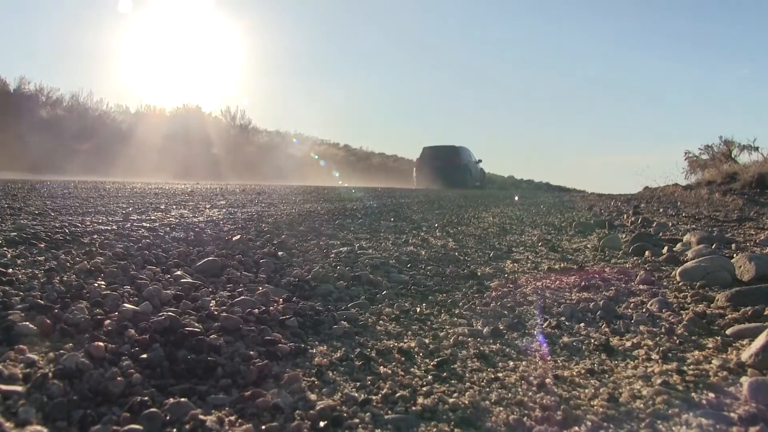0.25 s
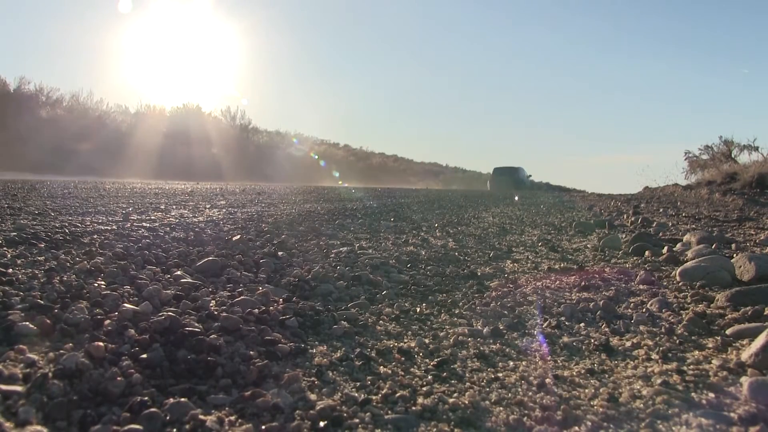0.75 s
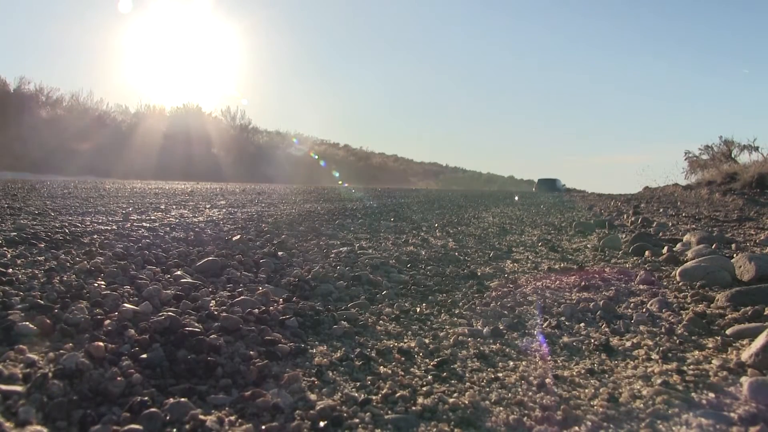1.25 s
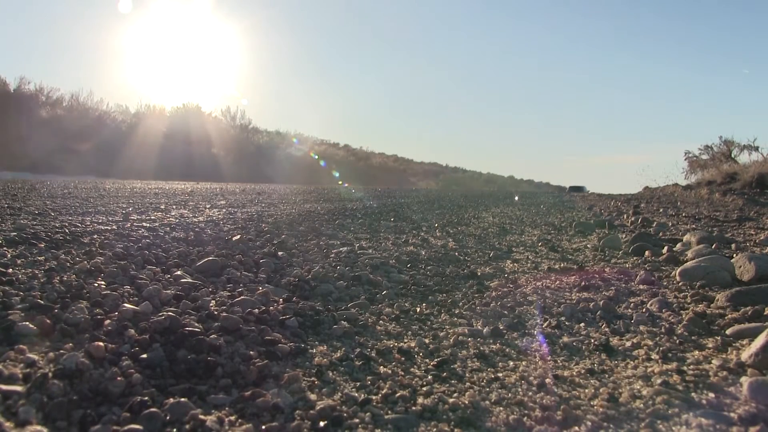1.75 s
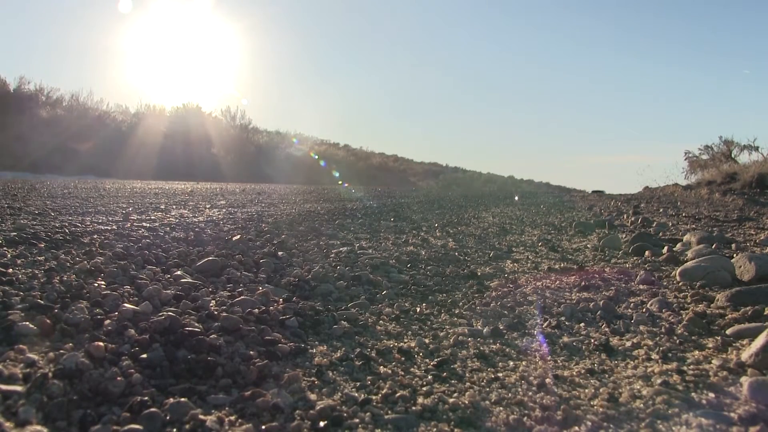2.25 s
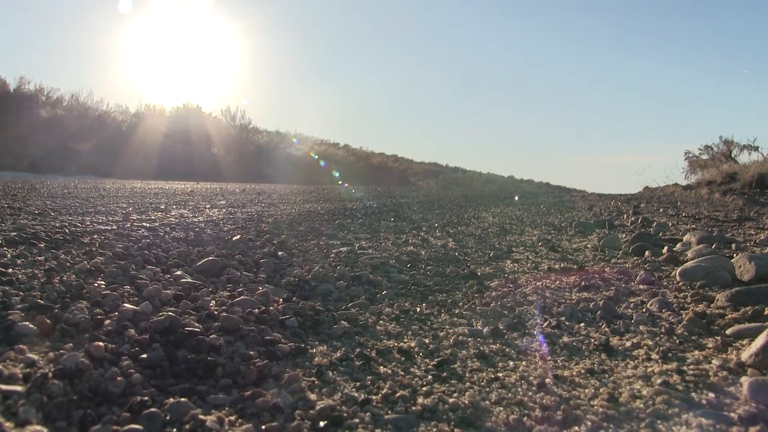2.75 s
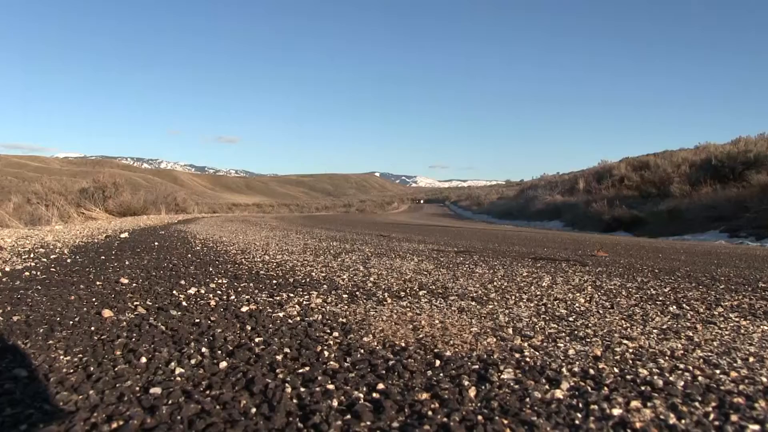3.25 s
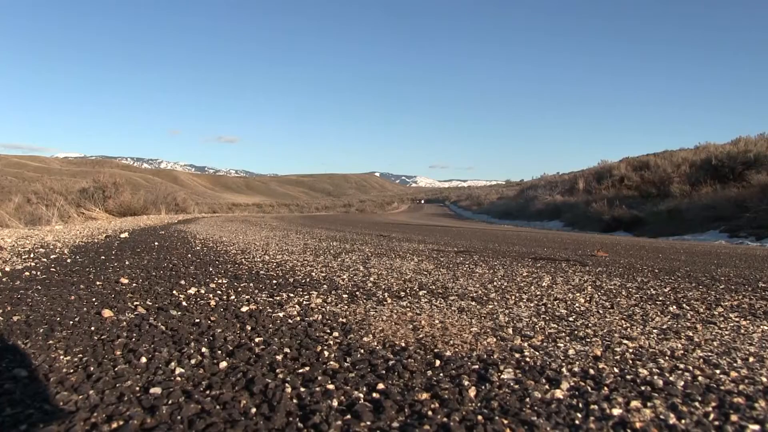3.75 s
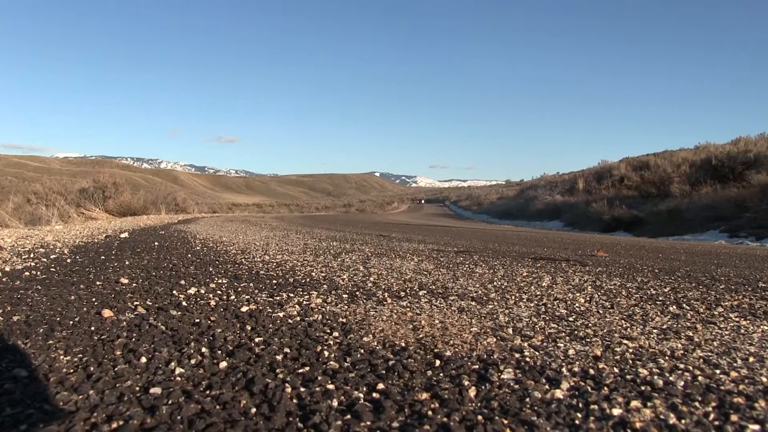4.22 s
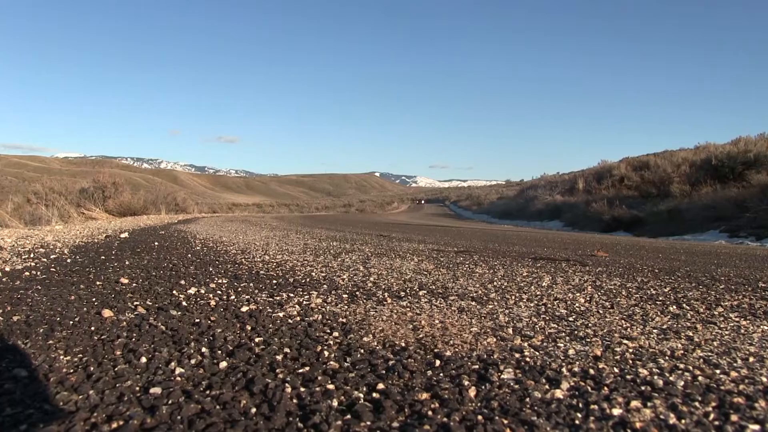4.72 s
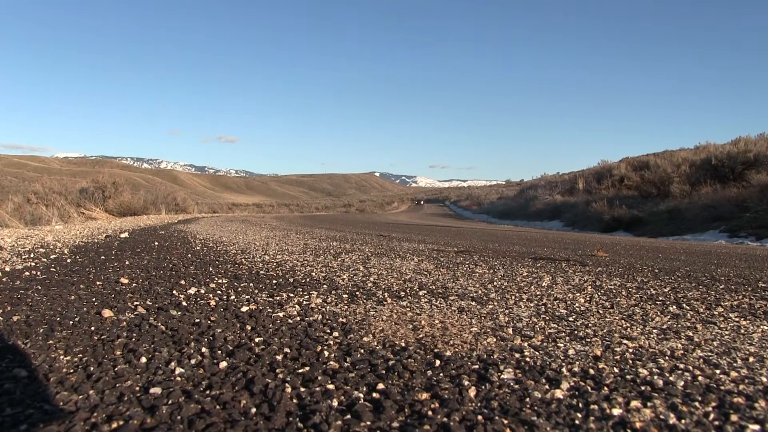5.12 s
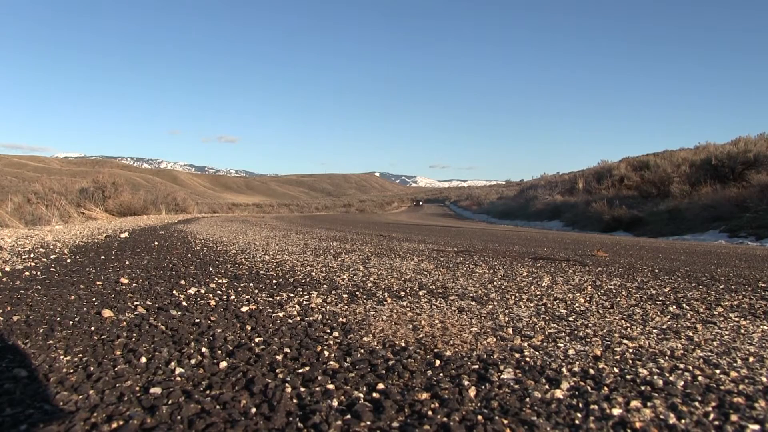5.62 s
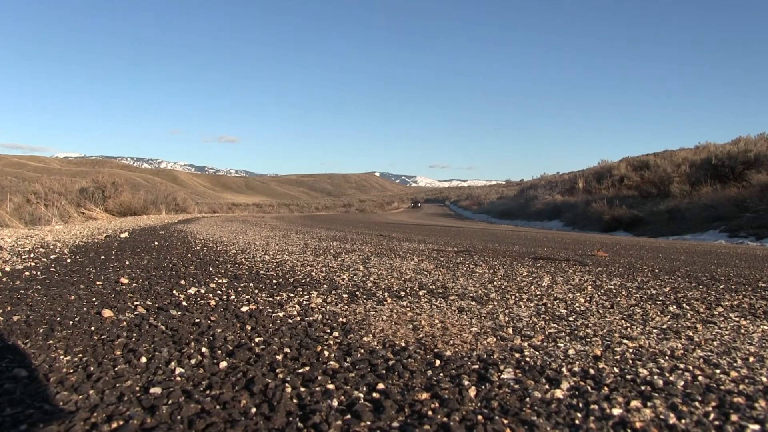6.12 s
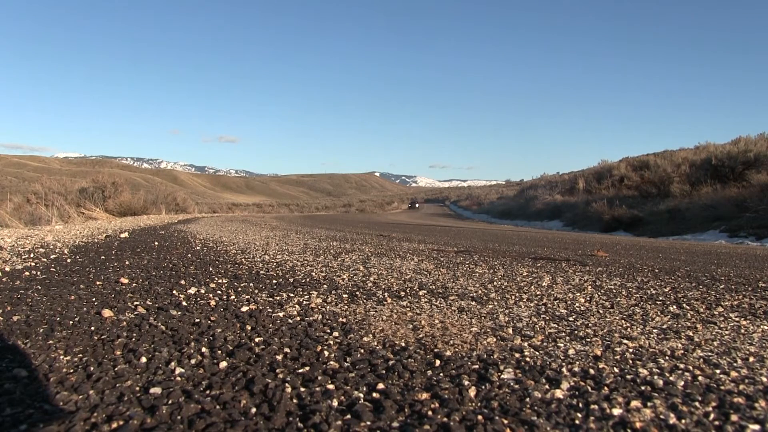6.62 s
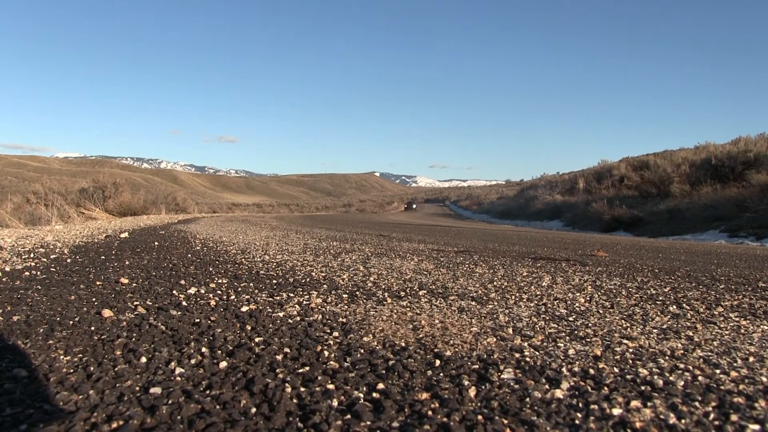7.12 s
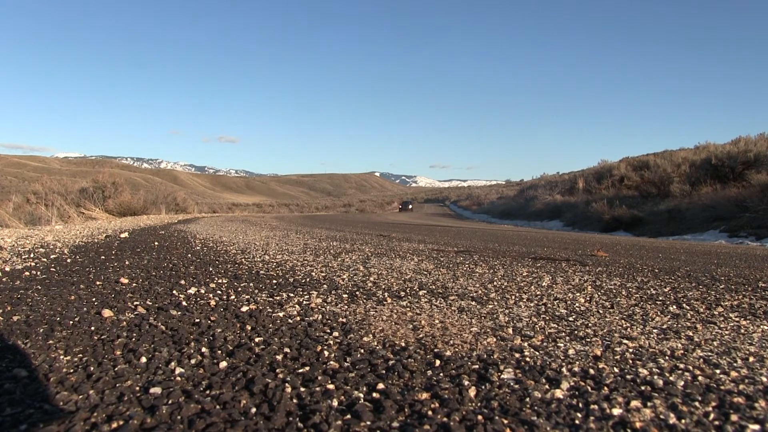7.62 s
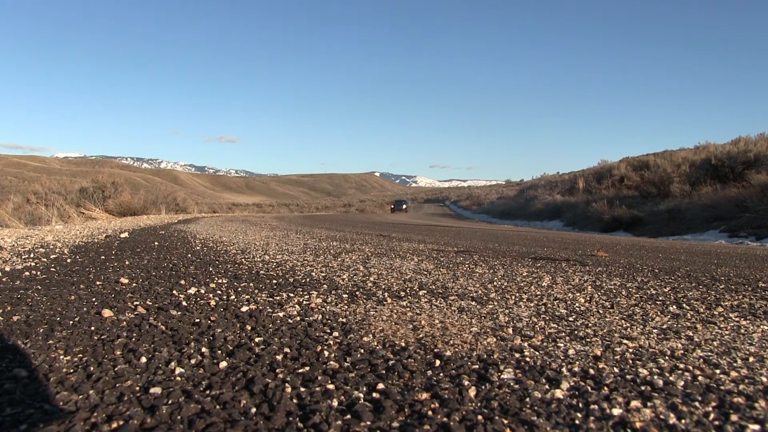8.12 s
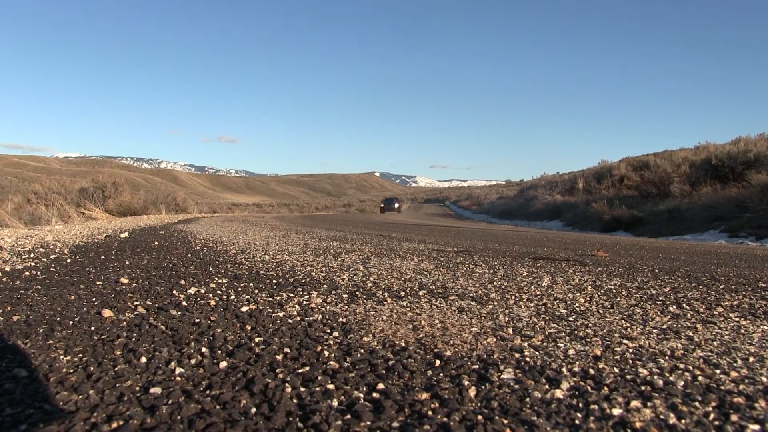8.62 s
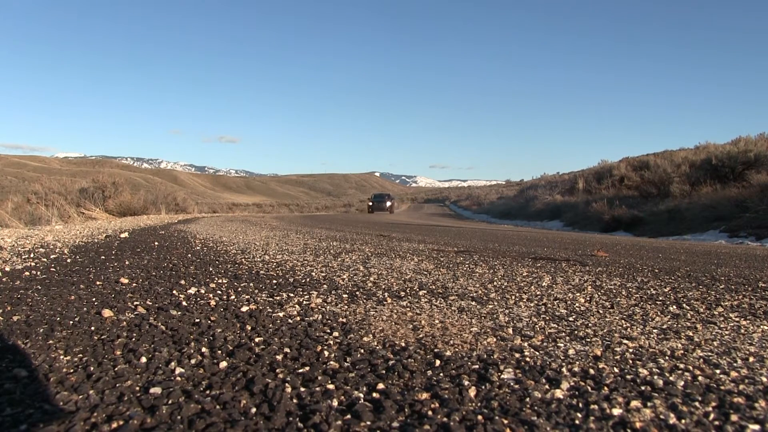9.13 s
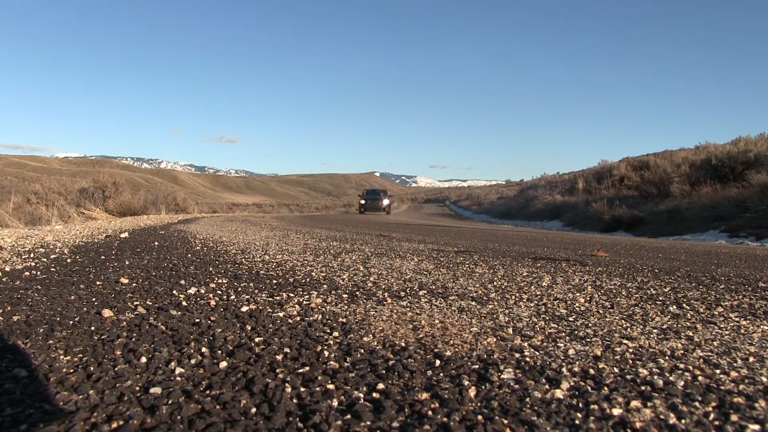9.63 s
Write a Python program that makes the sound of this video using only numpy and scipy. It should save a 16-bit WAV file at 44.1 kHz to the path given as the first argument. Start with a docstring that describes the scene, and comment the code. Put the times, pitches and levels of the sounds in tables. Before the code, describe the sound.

Close loud car exhaust with a backfire and gear change pulls away over gritty road, then a distant engine hum and tyre roar near under rumbling microphone gusts.

```python
"""A turbocharged car on a country road, heard from ground level in two scenes joined by a hard cut.
First it speeds away: stacked firing orders over tyre hiss and grit, decaying rings for the exhaust cracks,
a swell of noise for the turbo's blow-off at the upshift, then the pull of the next gear.
Then it comes from far off: it shifts, pulls through a long gear, lifts and coasts nearer on noise-made
tyre roar, while low-frequency gusts buffet the microphone and make a gain control duck the car."""
import sys
import numpy as np
from scipy import signal
from scipy.fft import rfft, irfft, next_fast_len
from scipy.io import wavfile
from scipy.ndimage import uniform_filter1d, minimum_filter1d

SR = 44100
rng = np.random.default_rng(int(sys.argv[2]) if len(sys.argv) > 2 else 0)


def digitize_waveform(pressure):
    """Quantize a signal to 16-bit integers and store it at the path in sys.argv[1].

    Rows of a 2-D input are taken as channels; values are limited to [-1, 1].
    """
    field = np.atleast_2d(pressure).T
    bounded = np.clip(field, -1, 1)
    quanta = np.round(bounded * 32767).astype(np.int16)
    wavfile.write(sys.argv[1], SR, quanta)


N = 435257
TIME = np.arange(N) / SR
CUT_S = 2.835  # the second scene starts here


def amp(db):
    """Decibels to gain."""
    return 10 ** (np.asarray(db) / 20)


def unit(x):
    """Scales to rms 1."""
    return x / np.sqrt(np.mean(x ** 2) + 1e-20)


def curves(rows):
    """Each column of a table after its time column, as a curve over time."""
    s, *columns = np.transpose(rows)
    return [np.interp(TIME, s, c) for c in columns]


def colour(points, hz):
    """Gain of a tabled spectrum at the given frequencies."""
    f, db = np.transpose(points)
    return amp(np.interp(np.log(hz + 1), np.log(f + 1), db))


def shaped(gain_at):
    """Noise of rms 1 with a gain that depends on frequency."""
    size = next_fast_len(N, True)
    spectrum = rfft(rng.standard_normal(size))
    hz = np.fft.rfftfreq(size, 1 / SR)
    return unit(irfft(spectrum * gain_at(hz), size)[:N])


def noise(points):
    """Noise of rms 1 with a tabled spectrum."""
    return shaped(lambda f: colour(points, f))


def wander(hz):
    """Slow chance of rms 1, up to about the given rate."""
    return shaped(lambda f: 1 / (1 + (f / hz) ** 2) ** 2)


def swell(s, length):
    """A bell-shaped envelope around a moment."""
    return np.exp(-np.minimum((2 * (TIME - s) / length) ** 2, 20) * 2)


def resonate(x, hz, width_hz):
    """A resonance of gain 1 that follows the curve hz: shift it down to zero, smooth, shift back."""
    turn = np.exp(2j * np.pi * np.cumsum(hz) / SR)
    r = np.exp(-np.pi * width_hz / SR)
    return 2 * (turn * signal.lfilter([1 - r], [1, -r], x / turn)).real


def hillside(x, wet_db, t60=0.8, gap_s=0.03):
    """The slopes scatter the engine back, late and faint: a decaying noise tail after a gap."""
    t = np.arange(SR) / SR
    tail = rng.standard_normal(SR) * amp(-60 * t / t60) * np.clip(t / gap_s - 1, 0, 1)
    return x + amp(wet_db) * signal.fftconvolve(x, tail / np.linalg.norm(tail))[:N]


# the driver lifts off the throttle: (time [s], time shut [s], drop of the boom [dB])
LIFTS = [(0.37, 0.19, 7), (3.53, 0.081, 7.5), (7.72, 0.14, 8.5)]
SHUT_S, SPOOL_S = 0.017, 0.3  # the throttle shuts fast; boost builds again slowly


def throttle_drop():
    """Decibels lost while the throttle is shut and until the turbo has spooled up again."""
    drop = 0
    for s, shut, db in LIFTS:
        closing = np.clip((TIME - s) / SHUT_S, 0, 1)
        spooling = np.clip(1 - (TIME - s - shut) / SPOOL_S, 0, 1)
        drop = drop + db * closing * spooling
    return drop


SECOND_DROP, RASP_DROP = 1.4, 2.3  # overtones drop this many times as far as the boom


def exhaust(speed, levels, pipe, boom_db, rasp_db, uneven_db, jitter, shimmer_db, rough, fading_db,
            count=24):
    """Firing pulses as a stack of orders through a fixed pipe; returns the sound and the firing phase."""
    hz, drop = curves(speed)[0], throttle_drop()
    first_db, second_db, upper_db = curves(levels)
    cycles = np.cumsum(hz) / SR
    phase = 2 * np.pi * (cycles + jitter * wander(98))  # no two firings are timed alike
    first = amp(first_db - drop) * np.cos(phase)
    second = amp(second_db - SECOND_DROP * drop) * np.cos(2 * phase)

    rasp, flutter = np.zeros(N), wander(22)
    # half orders and whole orders, from 1.5 up to count / 2, without order 2
    for k in np.setdiff1d(np.arange(count + 1) / 2, [0, .5, 1, 2]):
        level = amp(uneven_db) if k % 1 else 1  # unequal cylinders add half orders
        turbulence = 1 + rough * np.roll(flutter, rng.integers(N))  # each order flutters at other moments
        rasp += level * colour(pipe, k * hz) * turbulence * np.cos(k * phase)

    fading = fading_db * wander(21)  # moving air makes the rasp fade in and out
    rasp_gain = amp(upper_db + rasp_db - RASP_DROP * drop + fading)
    sound = amp(boom_db) * (first + second) + rasp_gain * rasp
    return -sound * amp(shimmer_db * wander(71)), phase


# driving away, top of one gear, upshift, steady pull: (time [s], firing rate [Hz])
AWAY_SPEED = [(0, 207), (0.06, 222), (0.19, 208), (0.36, 197), (0.5, 130.5), (0.68, 120.6), (1.8, 132.7),
              (2.83, 144)]
# exhaust with the throttle open, before the trims boom_db and rasp_db:
# (time [s], boom of order 1 [dB], order 2 [dB], rasp of the higher orders [dB])
AWAY_EXHAUST = [(0.04, -19.5, -28, -25.5), (0.14, -13, -16, -29.5), (0.2, -9.5, -16.5, -29.5),
                (0.29, -9.5, -18, -24.5), (0.601, -11, -10.5, -27), (0.948, -11, -14, -32.5),
                (1.6, -9, -19.5, -32), (2.1, -7.5, -18.5, -37.5), (2.55, -9.5, -15.5, -29),
                (2.82, -10.5, -16.5, -27)]
# what the pipe lets out of the higher orders, from behind: (frequency [Hz], gain [dB])
PIPE_BEHIND = [(250, -2.5), (380, 11.5), (440, 3.5), (510, 6.5), (575, 7.5), (650, -3.5), (710, -6.5),
               (780, -0.5), (880, -19.5), (1100, -15.5), (1500, -30), (2200, -30)]
# engine gain around the ignition cut, held at the last value afterwards: (time [s], level [dB])
IGNITION = [(0.06, -2), (0.066, -17.5), (0.11, -15.5), (0.127, -7.5)]
# colour of the exhaust rush: (frequency [Hz], relative level [dB])
AWAY_ROAR = [(20, -6.5), (60, -7), (150, 1.5), (300, -8), (550, 2.5), (800, -5.5), (1100, -8.5),
             (1600, -13.5), (2100, -24), (3000, -57.5), (5000, -63.5)]
# colour of the gritty tyre hiss: (frequency [Hz], relative level [dB])
AWAY_HISS = [(900, -37.5), (1800, -1.5), (2400, 2), (3000, 1.5), (3500, -6), (4000, -16.5), (5000, -24),
             (7000, -32), (11000, -38.5), (16000, -50)]
# colour of air heaving at the microphone, also for the wind: (frequency [Hz], relative level [dB])
HEAVE = [(2, -13), (7, -1.5), (12, 8), (22, 0), (34, -6), (50, -19), (90, -42), (200, -94.5)]
# exhaust rush holds steady with the throttle open; gritty tyre hiss fades with distance
AWAY_ROAR_DB, AWAY_HISS_DB, HISS_FADE_DB_PER_S = -28.5, -41, 5.5


def driving_away():
    """The tailpipe faces the listener: hard firing pulses, gas noise that puffs with them, tyre hiss."""
    engine, phase = exhaust(AWAY_SPEED, AWAY_EXHAUST, PIPE_BEHIND, boom_db=7, rasp_db=6.5, uneven_db=-17.5,
                            jitter=0.0078, shimmer_db=0.54, rough=0.042, fading_db=-0.2)
    engine = engine * amp(curves(IGNITION)[0])
    puffs = unit(1 + 0.1 * np.cos(phase))
    rush_gain = amp(AWAY_ROAR_DB - 0.16 * throttle_drop())
    rush = rush_gain * noise(AWAY_ROAR) * puffs * amp(1.4 * wander(40))
    hiss_gain = amp(AWAY_HISS_DB - HISS_FADE_DB_PER_S * TIME)
    hiss = hiss_gain * noise(AWAY_HISS) * amp(1.2 * wander(60))
    breeze = amp(-26.5 - 3.7 * TIME) * noise(HEAVE)  # the car's wake dies away
    return hillside(engine, wet_db=-24.5) + rush + hiss + breeze


# stones flung by the tyres: (time [s], ring [Hz], level [dB])
STONES = [(0.4216, 1490, -16.5), (0.755, 1440, -18), (1.387, 949, -40), (1.522, 1866, -30.5),
          (2.352, 900, -24)]


def gravel(ring_s=0.001, grit_per_s=160, grit_db=-64, spread_db=3.0):
    """Flung stones clack as short rings, and random bursts of grit crackle under the departing tyres."""
    stones = np.zeros(N)
    for s, hz, db in STONES:
        t = np.clip(TIME - s, 0, 1)
        stones += amp(db) * np.sin(2 * np.pi * hz * t) * np.exp(-t / ring_s)
    strengths = amp(spread_db * np.minimum(rng.exponential(1, N), 4))
    clicks = (rng.random(N) < grit_per_s / SR) * strengths
    bursts = signal.lfilter([1], [1, -np.exp(-1 / (ring_s * SR))], clicks)
    grit = noise([(1000, -23.0), (3000, 0.5), (4500, -8.0), (7000, -14.5), (12000, -37.5)])
    return stones + amp(grit_db - HISS_FADE_DB_PER_S * TIME) * unit(bursts * grit)


# colour of the thin hiss, also for the ticks of the gusts: (frequency [Hz], relative level [dB])
AIR = [(100, -33.5), (2000, -9), (4000, -0.5), (8000, -4), (15500, -7.5)]


def thin_hiss(first_db=-91, second_db=-63):
    """A thin, steady hiss of noise, stronger in the second scene."""
    return amp(np.where(TIME < CUT_S, first_db, second_db)) * noise(AIR)


# exhaust cracks: (time [s], level [dB])
POPS = [(0.0595, -13), (0.0775, 1), (0.0955, -9), (0.1135, -12)]
# what a crack rings with: (frequency [Hz], decay time [s], level [dB])
POP_MODES = [(540, 0.0032, 0), (900, 0.0018, -4), (300, 0.003, -8), (110, 0.009, -11), (1230, 0.0018, -11)]
# colour of the crack's scattered tail: (frequency [Hz], relative level [dB])
POP = [(30, -15), (120, 10), (500, 4), (900, -22), (1400, -29.5), (2500, -41.5), (4500, -52), (8000, -57),
       (14000, -71)]


def backfire(tail_db=-22, tail_s=0.044, attack_s=0.0001):
    """Unburnt fuel explodes in the pipe: a muffled crack that rings briefly and scatters off the road."""
    out, scatter = np.zeros(N), noise(POP)
    for s, db in POPS:
        t = np.clip(TIME - s, 0, 1)
        bang = np.zeros(N)
        for k, (hz, life, level) in enumerate(POP_MODES):
            # neighbouring modes start in opposite directions
            bang += (-1) ** k * amp(level) * np.sin(2 * np.pi * hz * t) * np.exp(-t / life)
        tail = amp(tail_db) * scatter * (t > 0) * np.exp(-t / tail_s)
        out += amp(db) * (tail - bang * (1 - np.exp(-t / attack_s)))
    return out


# colour of the turbo's blow-off: (frequency [Hz], relative level [dB])
BLOW_OFF = [(800, -36), (2000, -5), (3000, 4.5), (3700, -3.5), (4300, -15), (6000, -17), (8000, -21.5),
            (11000, -27.5), (14000, -43.5)]


def blow_off(s=0.517, length=0.18, db=-40):
    """The valve dumps boost while the throttle is shut for the shift: a fluttering swell of noise."""
    return amp(db) * swell(s, length) * noise(BLOW_OFF) * amp(1.7 * wander(120))


# stretches of road with brighter tyre hiss: (start [s], end [s], fade-out [s], level [dB])
SIZZLES = [(1.996, 2.58, 0.06, -64), (8.848, 9.7, 0.52, -64)]
# colour of that bright hiss: (frequency [Hz], relative level [dB])
SIZZLE = [(2000, -8), (4500, -0.5), (6200, -8), (8000, -14), (14000, -41.5)]


def sizzle(rise_s=0.25):
    """The tyres hiss more brightly on some stretches of road: noise that fades in and out."""
    level = np.zeros(N)
    for start, end, fade, db in SIZZLES:
        fade_in = np.clip((TIME - start) / rise_s, 0, 1)
        fade_out = np.clip((end - TIME) / fade, 0, 1)
        level += amp(db) * fade_in * fade_out
    return level * noise(SIZZLE) * amp(1.5 * wander(80))


def cut_click():
    """The cut lands in the middle of a gust: the pressure jumps, which clicks, and settles within 0.1 s."""
    return -.38 * np.exp(-np.clip(TIME - CUT_S, 0, 1) / .012)


# coming closer, upshift, long pull, coasting: (time [s], firing rate [Hz])
TOWARD_SPEED = [(2.84, 124.6), (3.3, 142.2), (3.56, 129.6), (3.79, 90.5), (4.5, 101.1), (5.5, 119.2),
                (7.6, 158.4), (7.97, 159), (9.5, 117.8), (9.87, 111.2)]
# exhaust with the throttle open, before the trims boom_db and rasp_db:
# (time [s], boom of order 1 [dB], order 2 [dB], rasp of the higher orders [dB])
TOWARD_EXHAUST = [(2.9, -24, -52, -49), (3.1, -28.5, -43, -42), (3.299, -32.5, -39, -55),
                  (3.47, -28.5, -51.5, -58), (3.72, -20.5, -23, -41), (3.95, -21, -28.5, -41.5),
                  (4.55, -22, -26, -38.5), (5.15, -17.5, -23.5, -36.5), (5.65, -12.5, -32.5, -48),
                  (6.35, -18.5, -31, -33.5), (7.05, -17.5, -25.5, -34), (7.65, -19, -25.5, -32.5),
                  (8.1, -18.5, -43, -38), (8.549, -9.5, -21, -41), (8.8, -11, -27, -40.5),
                  (9.35, -5.5, -24, -38.5), (9.8, -9, -20, -41)]
# what the pipe lets out of the higher orders, from ahead: (frequency [Hz], gain [dB])
PIPE_AHEAD = [(200, -3), (290, 3), (340, 5), (400, 2.5), (480, -7), (560, -8.5), (680, -18), (820, -13),
              (1100, -26), (2200, -45.5)]
# tyres coming closer, before a fixed trim: (time [s], roar level [dB], gritty hiss level [dB])
TOWARD_ROAD = [(2.86, -45.5, -59), (4.1, -41.5, -57), (5.0, -37, -54.5), (6.3, -36, -50),
               (7.2, -32.5, -46.5), (7.85, -28, -47), (8.6, -18, -39), (8.74, -22, -45),
               (8.95, -18.5, -42.5), (9.4, -20.5, -38.5), (9.87, -26, -40.5)]
# colour of the tyre roar: (frequency [Hz], relative level [dB])
TOWARD_ROAR = [(30, -11), (120, 4), (250, 3.5), (400, 1), (600, 0.5), (830, -2.5), (1000, -7),
               (1200, -14.5), (1600, -22), (2400, -50.5), (5000, -73)]
# colour of the gritty tyre hiss: (frequency [Hz], relative level [dB])
TOWARD_HISS = [(700, -29), (1200, 7), (1500, 6.5), (1850, 4.5), (2250, -5), (3050, -5.5), (3600, -15.5),
               (4200, -26.5), (6000, -34.5), (16000, -60.5)]
# the road's reflection weakens one band of the tyre sound: (time [s], centre [Hz])
GROUND_DIP = [(2.86, 1220), (4.4, 1156), (5.5, 823.3), (6.5, 625), (8.3, 412), (9.87, 607)]


def coming_closer():
    """A distant engine hum of firing orders; noise-made tyre roar takes over as the car nears."""
    engine, phase = exhaust(TOWARD_SPEED, TOWARD_EXHAUST, PIPE_AHEAD, boom_db=2.5, rasp_db=4.0,
                            uneven_db=-21.0, jitter=0.006, shimmer_db=-0.8, rough=0.14, fading_db=-0.5,
                            count=18)
    roar_db, hiss_db = curves(TOWARD_ROAD)
    pulsing = unit(1 + 0.14 * np.cos(phase))
    roar = amp(roar_db + 4.5) * noise(TOWARD_ROAR) * amp(0.2 * wander(25)) * pulsing
    hiss = amp(hiss_db + 3.5) * noise(TOWARD_HISS) * amp(0.86 * wander(25))
    tyres = roar + hiss
    weakened_band = resonate(tyres, curves(GROUND_DIP)[0], width_hz=260)
    return hillside(engine, wet_db=-13.5) + tyres - 0.4 * weakened_band


# strength of the wind on the microphone: (time [s], level [dB])
WIND = [(2.86, -11), (3.05, -14), (3.55, -25.5), (3.9, -21.5), (4.4, -12), (5.1, -8), (5.5, -11),
        (5.75, -3), (6.15, -0.5), (7.0, -1), (7.4, -4), (8.5, -6.5), (9.2, -12.5), (9.87, -12)]
# colour of the wind's flutter: (frequency [Hz], relative level [dB])
FLUTTER = [(15, -16), (35, 2), (50, -2), (80, -7), (120, -12.5), (200, -27), (350, -36.5), (800, -36),
           (2000, -86.5)]
# eddies that thump the microphone: (time [s], length [s], level [dB])
THUMPS = [(4.351, 0.05, -30), (5.718, 0.097, -15), (6.174, 0.068, -8), (6.252, 0.064, -4),
          (6.605, 0.063, -20), (7.058, 0.091, -13.5), (9.654, 0.041, -7.5)]


def wind(flutter_db=-8, flutter_growth=1.274, gustiness_db=3.5):
    """Eddies heave at the microphone; their flutter grows faster than the wind, and some eddies thump."""
    wind_db, heave = curves(WIND)[0], noise(HEAVE)
    heave /= np.sqrt(uniform_filter1d(heave ** 2, size=6000) + 0.036)  # eddies of like strength in a gust
    flutter_gain = amp(flutter_db + flutter_growth * wind_db + gustiness_db * wander(20))
    flutter = flutter_gain * noise(FLUTTER)
    thumps = sum(amp(db) * swell(s, length) for s, length, db in THUMPS)
    thud = noise([(20, -20.5), (60, 11.5), (130, -10.5), (220, -2.5), (400, -18.5), (800, -28.5),
                  (2000, -53.5), (5000, -95)])
    return amp(wind_db) * heave + flutter + thumps * thud


# faint distant squeaks: (time [s], length [s], pitch [Hz], level [dB])
SQUEAKS = [(3.142, 0.096, 1880, -45), (3.295, 0.6, 1867, -55), (4.25, 0.084, 1850, -46.5)]


def squeaks(width_hz=130):
    """Faint squeaks: slow noise shifted up to a pitch, which makes a narrow, blurred tone."""
    out = np.zeros(N)
    fuzz = wander(width_hz) + 1j * wander(width_hz)
    for s, length, hz, db in SQUEAKS:
        out += amp(db) * swell(s, length) * (fuzz * np.exp(2j * np.pi * hz * TIME)).real
    return out


# big gusts, each a slow lurch of pressure: (time [s], length [s], level [dB])
GUSTS = [(4.683, 0.53, 1.5), (5.287, 0.33, 5), (5.912, 0.31, 12), (6.375, 0.21, 6), (7.169, 0.17, 7.5),
         (7.856, 0.25, 6.5)]
LURCH_HZ = 10


def gusts(tick_s=0.0013, tick_db=-43):
    """Each big gust is a deep lurch that overloads the microphone, heard as a tiny tick at its crest."""
    out, fizz = np.zeros(N), noise(AIR)
    for s, length, db in GUSTS:
        lurch = swell(s, length) * np.cos(2 * np.pi * LURCH_HZ * (TIME - s))
        tick = (TIME > s) * np.exp(-np.minimum(abs(TIME - s) / tick_s, 20))
        out += amp(db) * (lurch + amp(tick_db) * tick * fizz)
    return out


def gain_control(x, threshold_db=-6, recover_s=1.49):
    """Loud gusts push the gain down almost at once, car and all; it creeps back afterwards."""
    power_db = 10 * np.log10(abs(uniform_filter1d(x ** 2, size=2205)) + 1e-12)
    excess_db = np.maximum(power_db - threshold_db, 0)
    fade = np.exp(-TIME / recover_s)
    duck_db = np.maximum.accumulate(excess_db / fade) * fade  # peaks hold, then decay exponentially
    return x * amp(-uniform_filter1d(duck_db, size=441))


def scene():
    """The two scenes, one after the other, with the sounds that may fall in either."""
    first = driving_away() + gravel() + backfire() + blow_off()
    second = cut_click() + coming_closer() + wind() + gusts()
    both = thin_hiss() + sizzle() + squeaks()
    return (np.where(TIME < CUT_S, first, second) + both)[None]


def record(dry):
    """Gain control and a smooth peak limiter; then soft ends and the band limit."""
    ducked = gain_control(dry[0])
    ceiling = .92
    gain = minimum_filter1d(np.minimum(1, ceiling / (abs(ducked) + 1e-9)), size=401)
    gain = uniform_filter1d(uniform_filter1d(gain, size=201), size=201)
    ends = signal.windows.tukey(N, .0005)
    edge = signal.firwin(511, 15800, window=("kaiser", 9), fs=SR)  # low-pass at 15.8 kHz
    return signal.oaconvolve(ducked * gain * ends, edge, "same")[None]


dry = scene()
out = record(dry)
digitize_waveform(out)
```